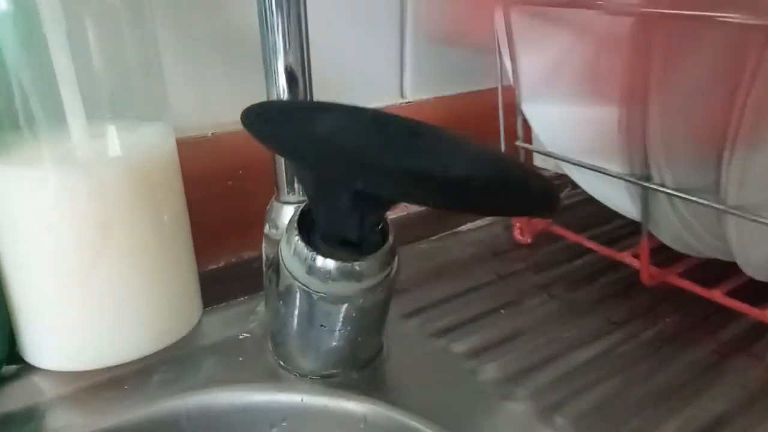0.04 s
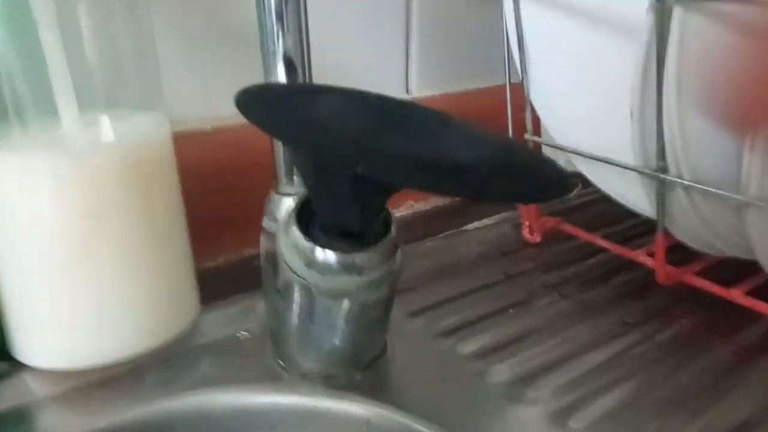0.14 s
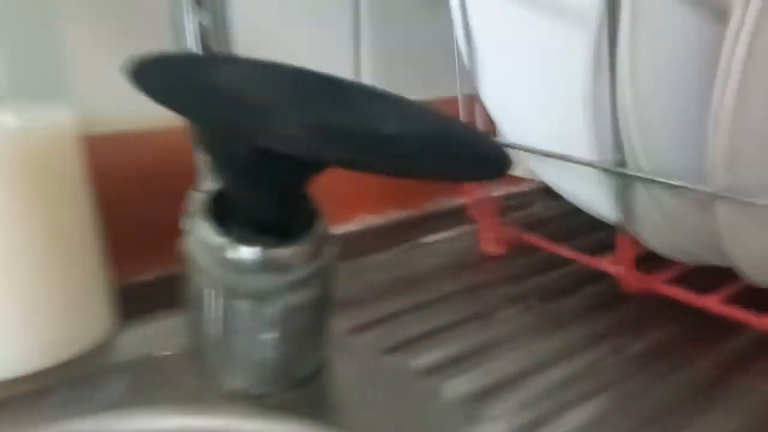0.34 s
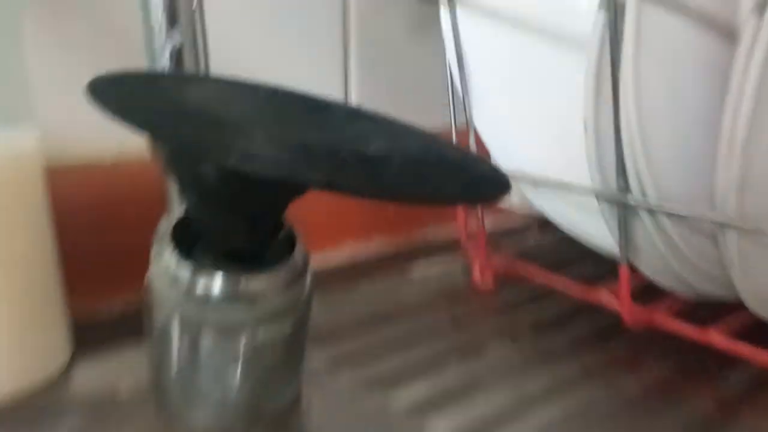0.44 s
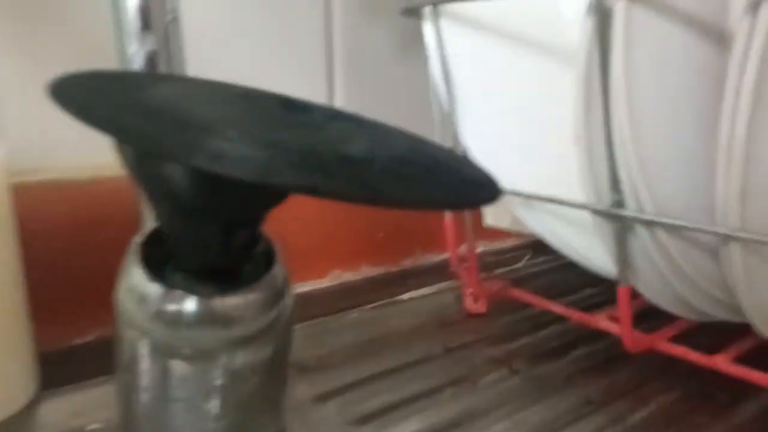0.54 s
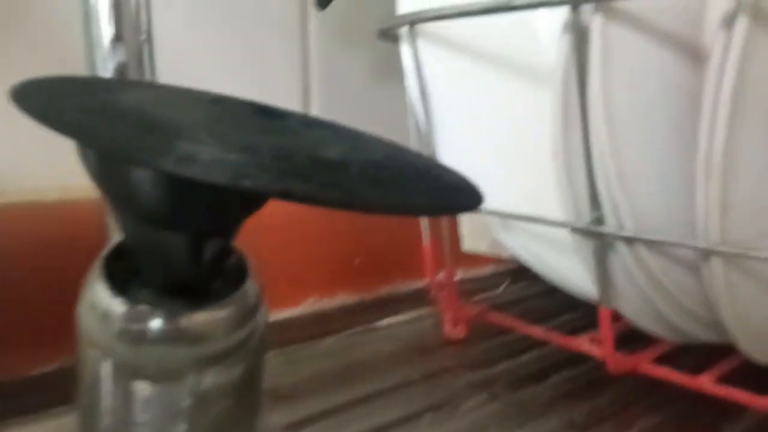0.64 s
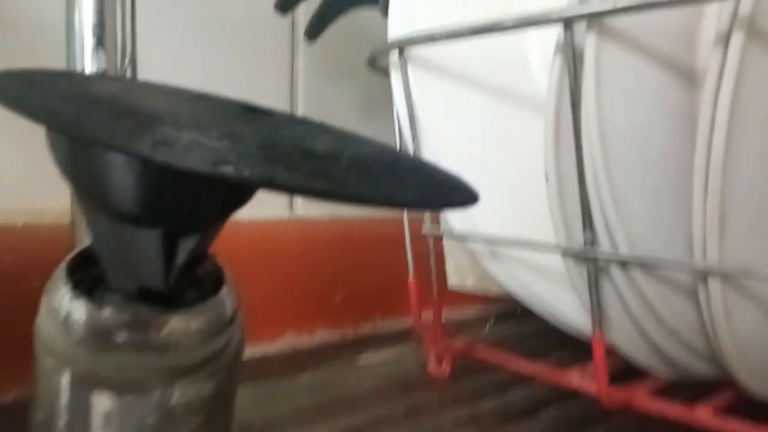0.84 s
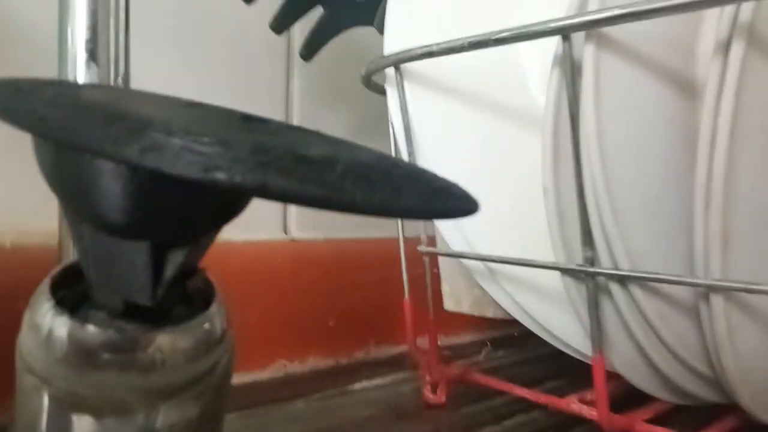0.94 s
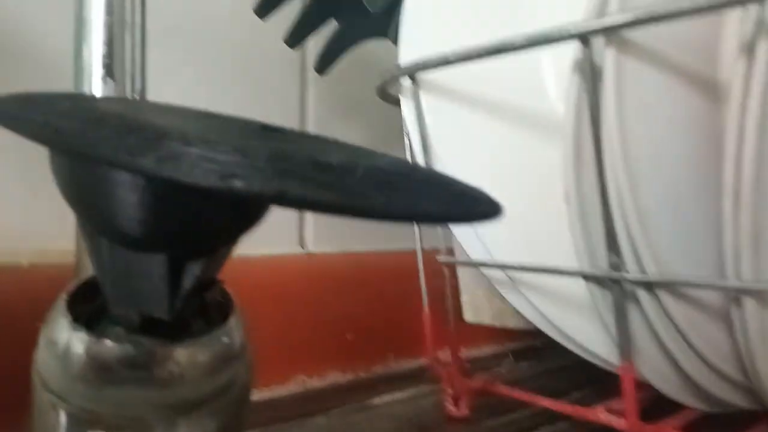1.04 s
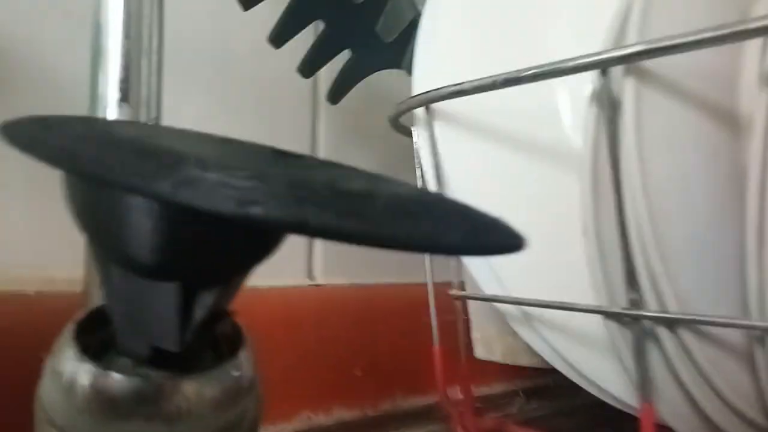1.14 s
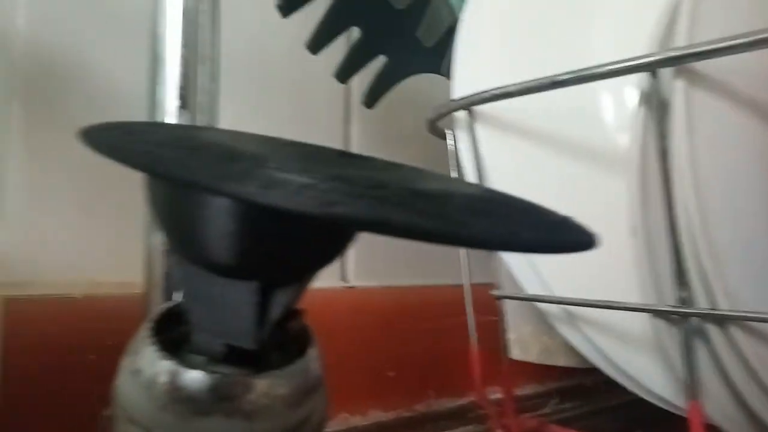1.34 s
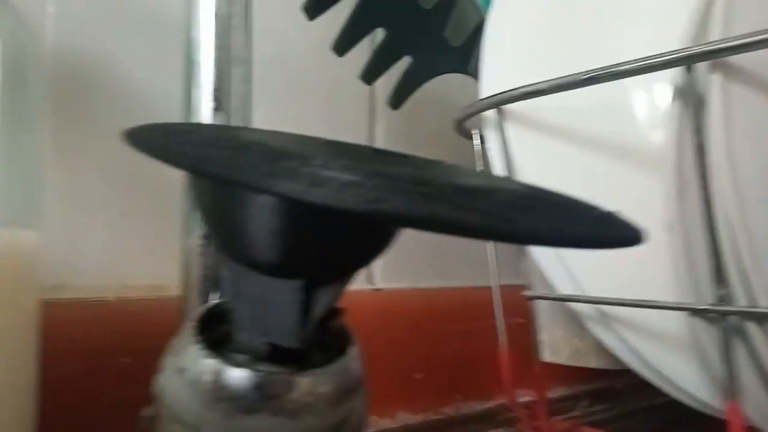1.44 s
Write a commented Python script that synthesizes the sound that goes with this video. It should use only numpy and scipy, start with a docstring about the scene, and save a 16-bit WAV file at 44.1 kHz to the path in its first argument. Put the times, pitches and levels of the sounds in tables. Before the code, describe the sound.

Water drips and trickles into a steel kitchen sink, with one sharp clack.

```python
"""A small tiled kitchen: water runs off in a steel sink after the tap is shut.
Short splashy surges of grainy noise swell and drain over a thin, faintly whistling trickle.
Drops tap the sheet metal, which rings low after some; drips blip, and one sharp clack rings briefly.
The basin drums softly underneath, and the tiles put a short tail on the hits."""
import sys
import numpy as np
from scipy import signal
from scipy.fft import rfft, irfft, next_fast_len
from scipy.io import wavfile
from scipy.ndimage import uniform_filter1d, map_coordinates

SR = 44100
rng = np.random.default_rng(int(sys.argv[2]) if len(sys.argv) > 2 else 0)


def log_audio(samples):
    """Write samples as a 16-bit WAV file to the path given in sys.argv[1]."""
    # one column per channel
    frames = np.atleast_2d(samples).T
    # limit to full scale, then quantise
    limited = np.clip(frames, -1, 1)
    pcm = np.round(limited * 32767).astype(np.int16)
    wavfile.write(sys.argv[1], SR, pcm)


N = 66150


def surges():
    """Each surge of water swells and drains: a wash with its own share of gurgle and fine spray."""
    # (peak [s], rise [s], fall [s], level [dB], gurgle over the wash [dB], spray over the wash [dB])
    swells = [(.05, 0.032, 0.029, -70, 2, -21), (0.199, 0.019, 0.056, -62.5, 6, -36),
              (0.241, 0.021, 0.011, -48, -4, -0.5), (0.289, 0.012, .042, -54.5, -2.5, -4.5),
              (.422, 0.018, 0.023, -52.5, -9, 4.5), (0.459, 0.024, 0.014, -46.5, -4, -6.5),
              (.478, 0.0068, 0.0085, -46.5, -9, -6), (0.516, 0.019, 0.018, -59.5, -2, 4),
              (.64, 0.026, 0.025, -68, 9, 3.5), (.752, 0.048, 0.037, -55, 2, -5.5),
              (0.795, 0.014, 0.013, -46, -11, 3.5), (0.822, 0.016, 0.025, -52.5, 3, -17),
              (0.874, 0.0084, 0.021, -57.5, -7, 2), (0.923, 0.037, 0.016, -49, -5, -11),
              (1.002, 0.054, 0.056, -47, -0.5, -11.5), (1.005, 0.024, 0.0092, -46.5, 0, -20),
              (1.14, 0.069, 0.069, -52, 0.5, -21), (1.195, 0.021, 0.026, -41.5, -0.5, -5.5)]
    # tone of the mid wash, low gurgle and bright spray: (frequency [Hz], level [dB])
    wash = [(400, -34), (900, -7), (1450, 1.5), (1750, -1.5), (2200, 2), (2700, 0.5), (3400, -1),
            (4400, -16.5), (5400, -18), (7000, -19.5), (12000, -47)]
    gurgle = [(40, -40), (100, -20), (250, -9), (430, 0.5), (560, -5), (680, -4.5), (950, 0), (1350, -4.5),
              (1900, -10.5), (3000, -17), (6000, -53)]
    spray = [(500, -43), (2000, -0.5), (3300, 3.5), (4300, 2.5), (5300, -3), (6700, 1.5), (8300, -6.5),
             (10000, -6), (13000, -19), (15200, -12.5), (16500, -30)]
    squareness = 3.17
    t, power = np.arange(N) / SR, np.zeros((3, N))
    for s, rise, fall, db, gurgle_db, spray_db in swells:
        swell = np.exp(-np.abs((t - s) / np.where(t < s, rise, fall)) ** squareness)
        power += amp([[db], [db + gurgle_db], [db + spray_db]]) ** 2 * swell
    return sum(np.sqrt(p) * water_noise(colour) for p, colour in zip(power, (wash, gurgle, spray)))


def drop_taps():
    """Drops land on the steel, each a tap with a pitched plop."""
    # (time [s], level [dB], tilt [dB/octave], spread [ms], cut-off [Hz], plop [Hz], plop lift [dB])
    taps = [(.6576, -21.5, 1, 1.03, 2800, 1560, 6.5), (.6999, -36, 1, 0.18, 8000, 2200, 8),
            (.7060, -24, 5.5, 0.32, 4600, 2040, 6.5), (.7560, -20, 1.5, 0.55, 3880, 2230, 2.5),
            (.7845, -33, -8, 1.09, 2000, 286, 6), (.8010, -20.5, -1.5, 1.27, 5000, 1090, 6.5),
            (.8662, -34, -2, 0.96, 14000, 450, 2), (.8918, -19, .5, 0.776, 4000, 2300, 6.5),
            (.8956, -26, -1, 0.98, 5500, 2600, 11), (.9127, -16, -2.5, 0.495, 9000, 910, 4),
            (1.0760, -28.5, -4, 0.82, 1500, 716, 11)]
    # tone of the tapped steel: (frequency [Hz], level [dB])
    colour = [(40, -41), (100, -4.5), (220, 4.5), (400, 8.5), (720, 0), (1080, 0.5), (1500, 0), (1750, -5),
              (2150, -3.5), (2900, -9), (3500, -11.5), (4600, -26.5), (7000, -26), (12000, -29),
              (16000, -50)]
    return sheet_metal_hits(taps, colour)


def clack():
    """A hard hit with a light lead-in, two quick rebounds and a short ring."""
    # (time [s], level [dB], tilt [dB/octave], spread [ms], cut-off [Hz], knock [Hz], knock lift [dB])
    contacts = [(.3620, -29.5, 4.5, 0.16, 12000, 2700, 16), (0.3655, -11.5, 0, 0.29, 16000, 2980, 5.5),
                (.3689, -22, 1.5, 0.29, 2000, 1700, 7.5), (0.3749, -29, 1, 0.23, 2000, 680, 8)]
    # tone of the contacts: (frequency [Hz], level [dB])
    colour = [(35, -39), (80, -1), (200, -4.5), (380, 6.5), (650, 5), (900, 12), (1400, -3), (2200, -12.5),
              (2900, -11), (3700, -20.5), (4700, -10.5), (5500, -19), (6500, -8.5), (8000, -22),
              (10000, -16), (12000, -23.5), (15500, -26)]
    # ringing modes: (frequency [Hz], level [dB], t60 [s])
    modes = [(102, -41.5, 0.074), (386, -38, 0.09), (670, -36, 0.05), (900, -31, 0.054), (1120, -43, 0.12),
             (1458, -45, 0.11), (2680, -48, 0.14), (6600, -47.5, 0.1), (7500, -53.5, 0.18),
             (9640, -54, 0.28)]
    out, t = sheet_metal_hits(contacts, colour), np.arange(SR // 4) / SR
    ring = sum(amp(db - 60 * t / t60) * np.sin(2 * np.pi * hz * t) for hz, db, t60 in modes)
    add(out, .3657, ring)  # on the hardest contact
    return out


def sheet_metal_hits(hits, colour, size=4096, resonance_octaves=0.15):
    """Short pulses spread as bending waves, treble outrunning bass; each has its own resonance."""
    out, hz = np.zeros(N), np.fft.rfftfreq(size, 1 / SR)
    khz = (hz + 30) / 1000  # offset keeps the tilt finite at 0 Hz
    for s, db, tilt_db, spread_ms, cutoff_hz, resonance_hz, lift_db in hits:
        resonance = 1 / (1 + (np.log2((hz + 1) / resonance_hz) / resonance_octaves) ** 2)
        tone_db = colour_db(colour, hz) + tilt_db * np.log2(khz) + lift_db * resonance
        spectrum = minimum_phase(amp(tone_db) / np.hypot(1, (hz / cutoff_hz) ** 2))
        dispersion = np.exp(-4j * np.pi * spread_ms * np.sqrt(khz))  # spread is the delay at 1 kHz
        pulse = irfft(spectrum * dispersion) / np.abs(irfft(spectrum)).max()
        add(out, s, amp(db) * pulse[:size // 2])
    return out


def soft_rings(attack_s=0.0023, rise_per_s=0.58):
    """Short soft pitched rings: drip blips, and the low ring of the steel just after some taps."""
    # (time [s], pitch [Hz], relative level [dB], t60 [s])
    rings = [(.074, 483, -55.5, 0.028), (0.277, 444, -45.5, 0.037), (.456, 724, -33.5, 0.016),
             (0.534, 269, -44, 0.047), (0.643, 332, -40, 0.017), (.660, 450, -35, 0.013),
             (0.771, 270, -39, 0.026), (.785, 300, -36.5, 0.018), (.867, 410, -37, 0.021),
             (.896, 400, -31.5, 0.012), (1.288, 254.5, -49, 0.092), (1.406, 1108, -51, 0.069),
             (1.446, 848, -47.5, 0.075), (1.484, 1685, -55, 0.071)]
    out, t = np.zeros(N), np.arange(SR // 8) / SR
    for s, hz, db, t60 in rings:
        phase = 2 * np.pi * hz * (t + rise_per_s * t * t / 2)
        envelope = 2 * amp(db - 60 * t / t60) * (1 - np.exp(-t / attack_s))
        add(out, s, envelope * np.sin(phase))
    return out


def splashes(half_length_s=0.0045, octaves=0.4):
    """Tiny droplets: soft puffs of noise, each around one pitch."""
    # (time [s], pitch [Hz], level [dB])
    droplets = [(0.019, 4450, -58.5), (.056, 3430, -56.5), (1.437, 3280, -51.5), (1.453, 4150, -62)]
    t, out = np.arange(N) / SR, np.zeros(N)
    for s, hz, db in droplets:
        white = rng.standard_normal(N)
        band = unit(filtered(white, lambda f: np.exp(-(np.log2((f + 1) / hz) / octaves) ** 2 / 2)))
        out += amp(db) * np.exp(-((t - s) / half_length_s) ** 2) * band
    return out


def trickle(dull_hz=6000, opens_s=0.22, waver_hz=60):
    """A thin run of water that starts dull and opens up; narrow, wavering whistles come and go."""
    # level ride of the run: (time [s], level [dB])
    ride = [(0, -62.5), (.06, -63), (.13, -68), (.2, -70.5), (.35, -62), (.5, -61.5), (.59, -60.5),
            (.67, -61.5), (.85, -76), (1.15, -67.5), (1.27, -62.5), (1.35, -62), (1.45, -58), (1.5, -59)]
    # its tone: (frequency [Hz], level [dB])
    colour = [(150, -26), (400, -16), (700, -6.5), (1080, -1.5), (1600, -6), (1900, -1.5), (2200, 4.5),
              (2600, -5), (3050, -3), (3600, -6), (4600, -8), (5300, -7.5), (6700, -11), (9500, -13.5),
              (12500, -31.5), (16000, -27)]
    # (middle [s], half length [s], pitch [Hz], glide [Hz/s], level [dB])
    whistles = [(.16, .1, 2220, 0, -66), (.09, .06, 1990, 0, -70), (1.275, .03, 3100, 0, -61),
                (1.335, .04, 4620, 2200, -70), (1.36, .07, 2240, -500, -70), (1.4, .08, 6690, 300, -78),
                (1.43, .07, 7700, 0, -78), (1.29, .045, 9070, 0, -79)]
    level_db, = curves(ride)
    run = water_noise(colour)
    dull = filtered(run, lambda hz: 1 / np.hypot(1, (hz / dull_hz) ** 2))
    opening = np.clip(np.arange(N) / SR / opens_s, 0, 1) ** 4
    out = amp(level_db) * (dull + opening * (run - dull))
    for s, half_length, hz, glide, db in whistles:
        t = np.arange(N) / SR - s
        phase = 2 * np.pi * (hz * t + glide * t * t / 2)
        whistle = wobble(waver_hz) * np.sin(phase) + wobble(waver_hz) * np.cos(phase)
        out += amp(db) * np.exp(-(t / half_length) ** 2 / 2) * whistle
    return out


def basin(drum_top_hz=398):
    """The bowl drums and rumbles under the water."""
    # level rides: (time [s], drumming [dB], rumble [dB])
    rides = [(0, -61, -57), (.1, -64, -56), (.15, -72.5, -64.5), (.24, -62.5, -58.5), (.35, -68, -63),
             (.47, -72, -65.5), (.58, -58, -73), (.68, -56, -66), (.78, -52, -56), (.86, -58.5, -75),
             (.93, -47.5, -60), (1.03, -56, -60.5), (1.17, -58, -51.5), (1.23, -53, -64.5),
             (1.29, -55.5, -102), (1.34, -63.5, -89), (1.42, -58, -79), (1.5, -58.5, -61)]
    # tone of the drumming and the rumble: (frequency [Hz], level [dB])
    drum_colour = [(100, -24), (190, -9), (250, 2), (310, 0.5), (390, -16), (600, -33), (1500, -59)]
    rumble_colour = [(20, -29), (50, -29), (85, -4.5), (130, 1.5), (180, -6), (300, -29), (800, -71)]
    drum_db, rumble_db = curves(rides)
    drum = filtered(even_noise(drum_colour), lambda hz: 1 / np.hypot(1, (hz / drum_top_hz) ** 6))
    return amp(drum_db) * drum + amp(rumble_db) * even_noise(rumble_colour)


def kitchen(x, t60=0.1, level_db=-13, attack_s=0.0008):
    """The tiles reflect a short, faint tail."""
    t = np.arange(SR // 3) / SR
    tail = rng.standard_normal(len(t)) * amp(-60 * t / t60) * (1 - np.exp(-t / attack_s))
    return amp(level_db) * signal.fftconvolve(x, tail / np.linalg.norm(tail))[:N]


def water_noise(colour, grain_db=2, patch_db=3):
    """Coloured noise of rms 1, broken into tiny splashes and brief patches of resonance."""
    grains = rng.standard_normal(N) * amp(grain_db * wobble(900))
    spectra = signal.stft(grains, nperseg=512)[2]
    patches = uniform_filter1d(rng.standard_normal(spectra.shape), size=3, axis=0)
    patches = uniform_filter1d(patches, size=5, axis=1)
    patchy = signal.istft(spectra * amp(patch_db * unit(patches)), nperseg=512)[1][:N]
    return unit(filtered(patchy, lambda hz: amp(colour_db(colour, hz))))


def even_noise(colour):
    """Coloured noise of rms near 1 with its deepest swings evened out."""
    x = filtered(rng.standard_normal(N), lambda hz: amp(colour_db(colour, hz)))
    power = uniform_filter1d(uniform_filter1d(x * x, size=900), size=900)
    return x / np.sqrt(np.abs(power) + 1e-20)


def minimum_phase(gain):
    """The spectrum with these gains and the tightest attack."""
    cepstrum = irfft(np.log(gain))
    half = len(cepstrum) // 2
    cepstrum[1:half] *= 2
    cepstrum[half + 1:] = 0
    return np.exp(rfft(cepstrum))


def amp(db):
    """Decibels to gain."""
    return 10 ** (np.asarray(db) / 20)


def unit(x):
    """Scale to rms 1."""
    return x / np.sqrt(np.mean(x ** 2) + 1e-20)


def colour_db(colour, hz):
    """Read an EQ curve of (frequency [Hz], level [dB]) points on a log axis."""
    points_hz, db = np.transpose(colour)
    return np.interp(np.log(hz + 1), np.log(points_hz + 1), db)


def curves(rows):
    """One value per sample for each column after the time."""
    s, *columns = np.transpose(rows)
    return [np.interp(np.arange(N) / SR, s, column) for column in columns]


def wobble(rate):
    """A smooth random curve of rms 1, rate knots a second."""
    return unit(map_coordinates(rng.standard_normal(N), [np.arange(N) * rate / SR]))


def filtered(x, response):
    """EQ x with a gain given as a function of frequency."""
    size = next_fast_len(N + SR // 2)
    return irfft(rfft(x, size) * response(np.fft.rfftfreq(size, 1 / SR)), size)[:N]


def add(track, s, sound):
    """Mix a sound in at s seconds."""
    part = track[max(0, round(s * SR)):][:len(sound)]
    part += sound[:len(part)]


def scene():
    """Hits with their room tail over the dry water and basin, in mono."""
    hits = drop_taps() + clack() + soft_rings() + splashes()
    return (hits + kitchen(hits) + surges() + trickle() + basin())[None]


def record(dry):
    """Roll off the deep bass and cut the very top."""
    low_cut_hz, top_hz = 55, 16300
    thin = signal.sosfilt(signal.butter(2, low_cut_hz, "high", fs=SR, output="sos"), dry[0])
    return filtered(thin, lambda hz: hz < top_hz)[None]


dry = scene()
out = record(dry)
log_audio(out)
```